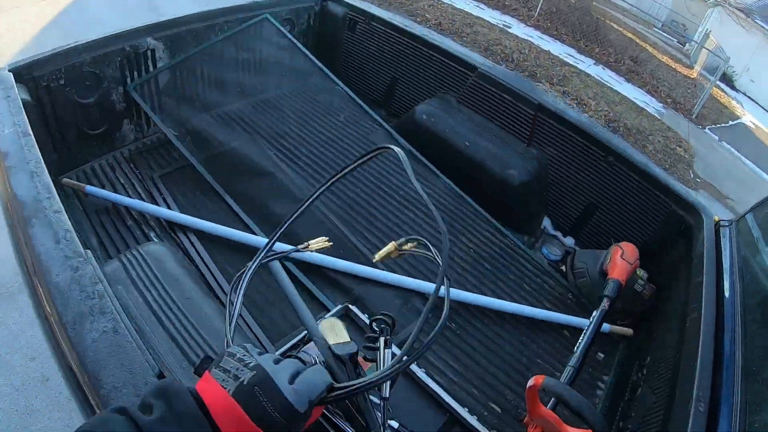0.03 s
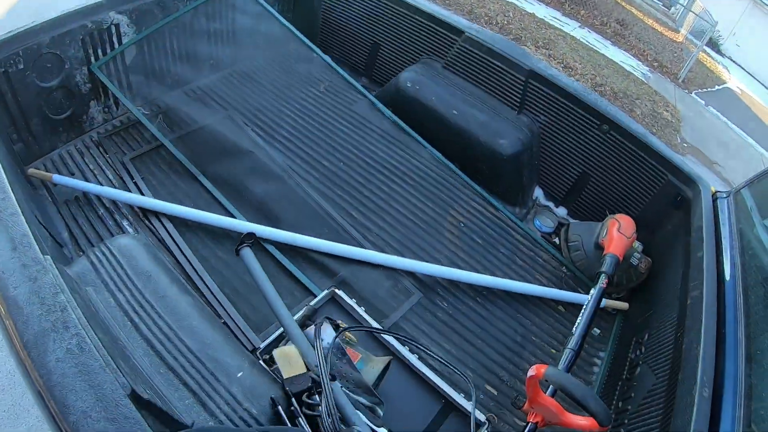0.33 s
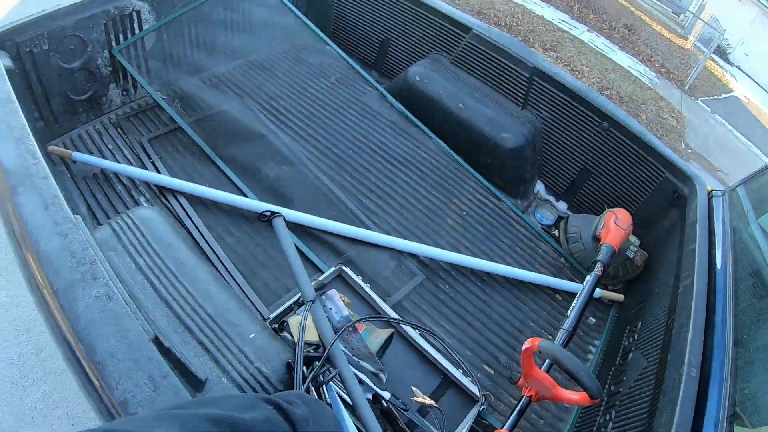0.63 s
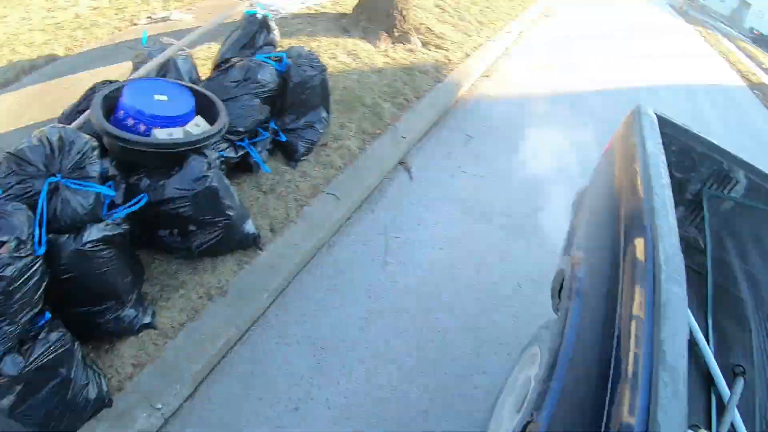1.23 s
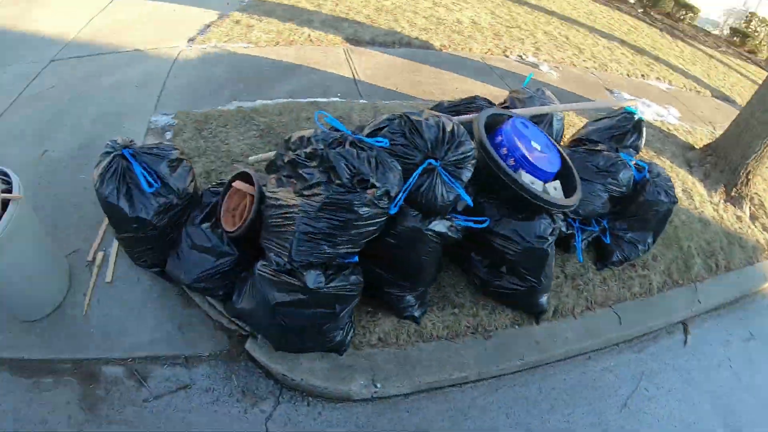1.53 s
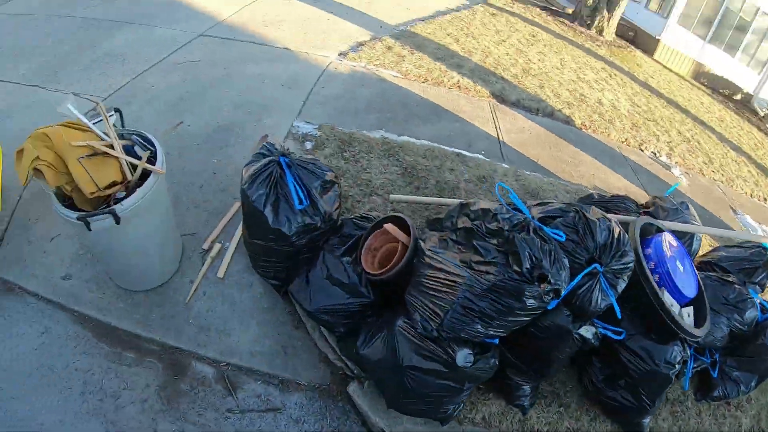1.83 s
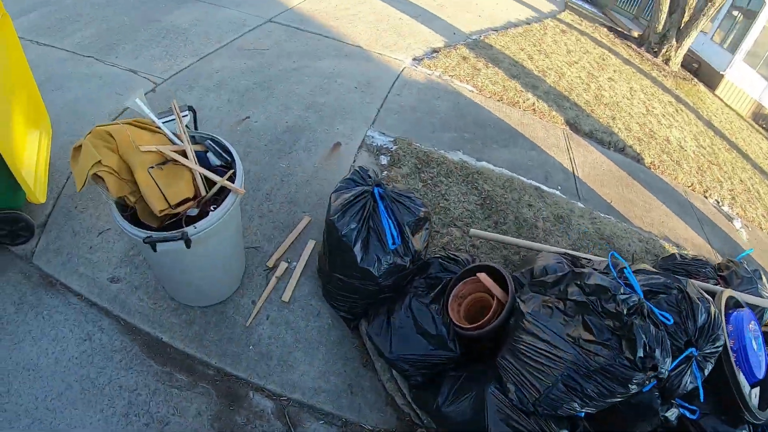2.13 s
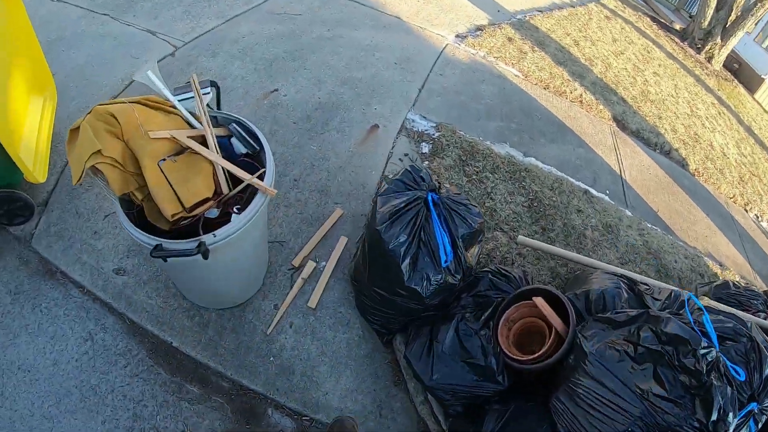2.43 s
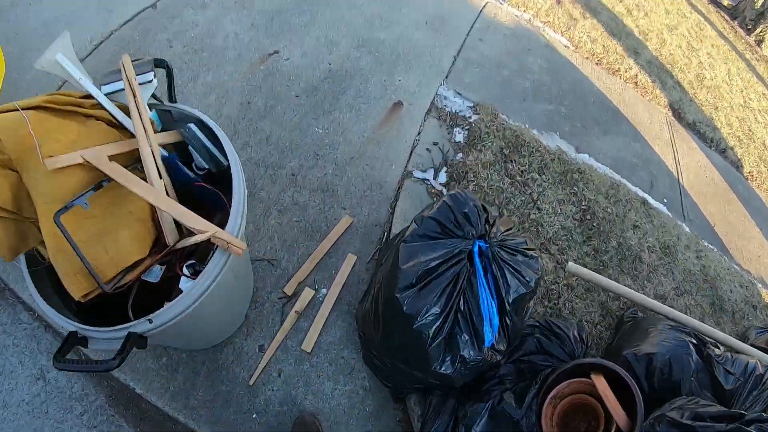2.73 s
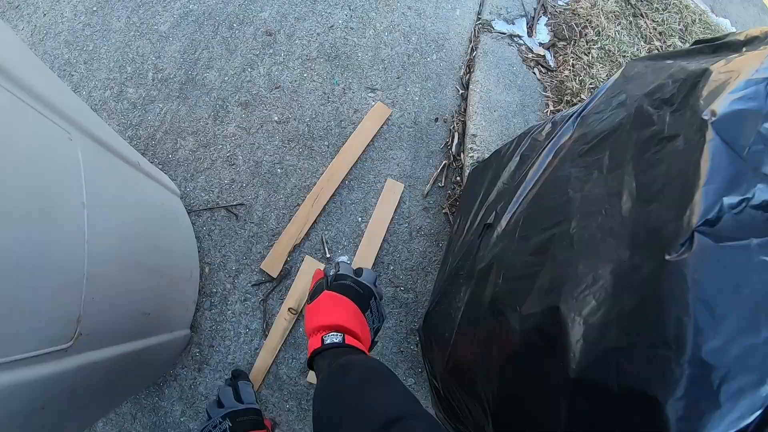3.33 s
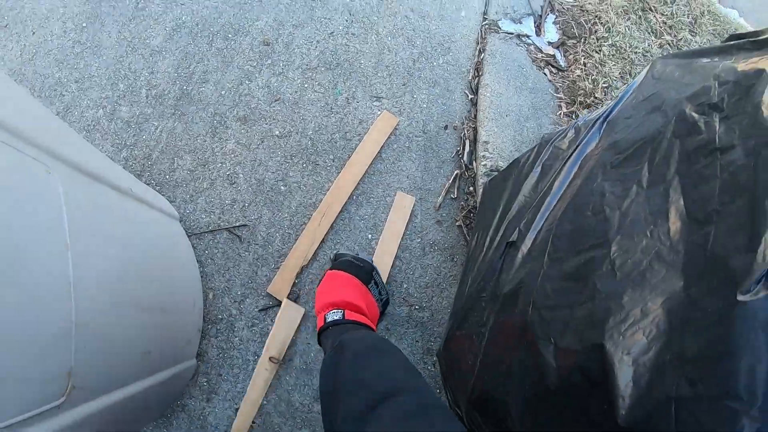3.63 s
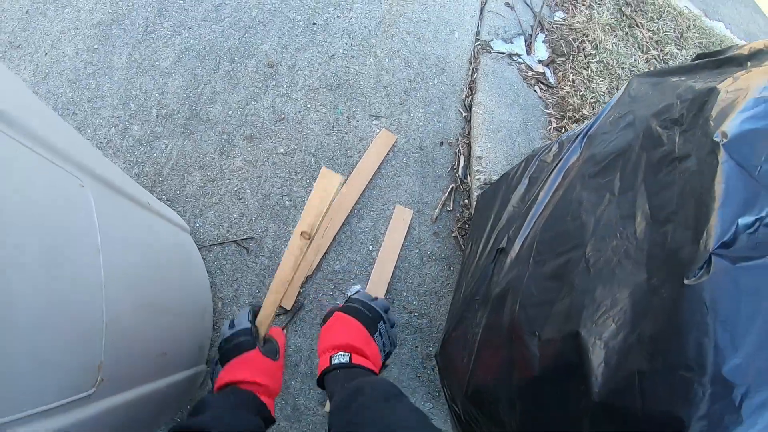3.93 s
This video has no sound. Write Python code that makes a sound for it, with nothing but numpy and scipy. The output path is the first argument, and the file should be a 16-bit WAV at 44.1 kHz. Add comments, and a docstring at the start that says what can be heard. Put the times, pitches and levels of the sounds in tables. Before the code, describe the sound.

Metal scrap crashes into a pickup bed, close and slightly right, clashing and sliding as the bed booms, and settles by about 1 second. An engine idles outdoors throughout, growing louder. From 1.4 seconds come a light jingle and faint footsteps, with wind buffeting the microphone around 1, 2 and 3 seconds. From 3.5 seconds, wooden slats click and scrape on concrete as they are gathered.

```python
"""Metal scrap crashes into a lined pickup bed, a little right of the microphone: it clashes, slides
and settles while the bed booms under it. An engine idles throughout in the open air. Soft footfalls
and a light jingle follow, a gust hits the microphone, and the stereo image narrows almost to mono.
Last, wooden slats click and scrape on concrete as they are gathered up."""
import sys
import numpy as np
from scipy import signal
from scipy.fft import rfft, irfft, next_fast_len
from scipy.io import wavfile
from scipy.ndimage import map_coordinates

SR = 44100
rng = np.random.default_rng(int(sys.argv[2]) if len(sys.argv) > 2 else 0)


def pcm_store(signal):
    """Save signal as 16-bit PCM."""
    levels = np.round(np.clip(np.atleast_2d(signal), -1, 1) * 32767)
    wavfile.write(sys.argv[1], SR, levels.astype(np.int16).T)


N = 176400  # 4 s
SCRAP_WIDTH, BED_WIDTH = 0.6, 0.1  # side over mid


def amp(db):
    """Decibels to gain."""
    return 10 ** (np.asarray(db) / 20)


def unit(x):
    """Scale to rms 1."""
    return x / np.sqrt(np.mean(abs(x) ** 2) + 1e-20)


def curves(rows):
    """One value per sample for each column after the time."""
    times, *columns = np.transpose(rows)
    return [np.interp(np.arange(N) / SR, times, column) for column in columns]


def wobble(rate):
    """A smooth random curve, rate knots a second."""
    return map_coordinates(rng.standard_normal(int(N * rate / SR) + 4), [np.arange(N) * rate / SR])


def colour(x, points, tilt=0):
    """Shape x by (Hz, dB) points and a tilt in dB per octave; rms 1."""
    size = next_fast_len(x.shape[-1] + 2048)
    octave = np.log2(np.fft.rfftfreq(size, 1 / SR) + 1)
    hz, db = np.transpose(points)
    gain = amp(np.interp(octave, np.log2(hz), db) + tilt * np.maximum(octave, np.log2(hz[0])))
    return unit(irfft(rfft(x, size) * gain, size)[..., :x.shape[-1]])


def noise(points, width, size, tilt=0):
    """Coloured noise as mid and side."""
    return colour(rng.standard_normal((2, size)), points, tilt) * [[1], [width]]


def broad(hz):
    """A wide, heavily damped resonance as (Hz, dB) points."""
    return [(hz / 10, -26), (hz / 2.5, -8), (hz * .8, 0), (hz * 1.25, 0),
            (hz * 1.7, -13), (hz * 3, -23), (hz * 4, -42), (hz * 20, -80)]


def burst(points, width, t, t60, attack):
    """A struck puff of coloured noise, its energy set by its envelope."""
    shape = amp(-60 * t / t60) * (1 - np.exp(-t / attack))
    pair = noise(points, 1, len(t)) * shape
    return pair / np.linalg.norm(pair, axis=1, keepdims=True) * np.linalg.norm(shape) * [[1], [width]]


def ring(modes, width, t, spread_db=4):
    """Modes struck at a random spot, as mid and side."""
    hz, db, t60 = np.transpose(modes)[:, :, None]
    waves = amp(db - 60 * t / t60) * np.exp(2j * np.pi * hz * t)
    gains = amp(rng.normal(0, spread_db, (2, len(hz))))
    phases = np.exp(2j * np.pi * rng.random((2, len(hz))))
    shape = (1 - np.exp(-t / 0.00057)) * (1 - (t / t[-1]) ** 6)
    return shape * (unit(gains * phases) @ waves).real * [[1], [width]]


def slips(rate, spread_db):
    """Random tiny contacts of uneven size, about rate a second."""
    signs = (rng.random(N) < rate / SR) * rng.choice([-1, 1], N)
    return signs * amp(spread_db * rng.standard_normal(N).clip(-2, 2))


def excite(contacts, ringing):
    """Start the ringing anew at every contact."""
    return signal.fftconvolve(contacts[None], ringing, axes=1)[:, :N]


def swell(length):
    """A smooth rise and fall over length seconds."""
    return np.sin(np.linspace(0, np.pi, max(int(length * SR), 8)))


def add(track, start, sound):
    """Mix a sound in at a time in seconds."""
    part = track[:, max(round(start * SR), 0):][:, :sound.shape[1]]
    part += sound[:, :part.shape[1]]


def ears(pair, pan_db=0):
    """Mid and side to left and right; positive pan leans left."""
    return np.array([pair[0] + pair[1], pair[0] - pair[1]]) * amp([[pan_db], [-pan_db]])


# Air around the microphone. Each row: time in seconds, then rush, hiss and low roar levels in dB.
AIR = [(0.9, -57.5, -67.5, -52), (1.12, -55, -64.5, -52.5), (1.53, -55, -63, -44.5),
       (1.89, -52, -64, -43.5), (2.37, -51, -67, -51), (2.63, -46, -61.5, -45.5), (2.89, -45, -61.5, -40.5),
       (3.36, -46.5, -65, -47.5), (3.7, -50, -63.5, -41.5), (4.0, -49.5, -64, -45.5)]
# Their spectra. Each row: frequency in Hz, level in dB.
RUSH_COLOUR = [(300, -15.5), (800, 2), (1500, 2), (2400, -2), (3500, -5), (4500, -11.5), (5500, -18),
               (8000, -25), (12000, -61.5)]
HISS_COLOUR = [(2000, -16), (5500, 0.5), (7500, 4), (9900, -1), (11000, -15), (15000, -47.5)]
ROAR_COLOUR = [(100, 0), (300, 1.5), (450, 0), (700, -5), (1000, -10), (1600, -17.5), (4000, -49)]
# Wind right on the microphone. Each row: start and length in seconds, level in dB, centre in Hz,
# side over mid, leftward pan in dB.
BUFFETS = [(.87, 0.058, -33, 126, 1.4, -6), (1.03, 0.056, -25.5, 99, 1.4, -6.5),
           (1.052, 0.023, -41, 367, 1.7, -3.5), (1.95, 0.28, -21.5, 50.4, 0.89, -2),
           (1.97, 0.19, -24, 170, 1.2, 0), (2.035, .13, -32, 340, 2.1, 0.5), (2.05, .035, -32, 560, 2.3, 1),
           (2.094, 0.075, -47, 872.5, 1.2, -0.5), (2.995, 0.07, -17.5, 122, 0.04, 7)]


def wind():
    """Outdoor rush, roar and hiss, with short buffets on the microphone."""
    rush_db, hiss_db, roar_db = curves(AIR)
    rush = amp(rush_db + 2 + 1.1 * wobble(17)) * noise(RUSH_COLOUR, 0.57, N)
    roar = amp(roar_db + 2 + 1.1 * wobble(16)) * noise(ROAR_COLOUR, 0.59, N)
    hiss = amp(hiss_db + 1) * noise(HISS_COLOUR, 1, N)
    out = ears(rush + roar + hiss, pan_db=-1)
    for start, length, db, hz, width, pan_db in BUFFETS:
        shape = swell(length)
        hump = [(hz / 8, -34), (hz / 2, -14), (hz * 0.56, 0), (hz * 1.3, 0),
                (hz * 1.66, -17), (hz * 5, -40), (hz * 20, -80)]
        add(out, start, ears(amp(db) * shape * noise(hump, width, len(shape)), pan_db))
    return out


# The idle, dead centre. Each row: time in seconds, shaft rate in Hz, boom level in dB.
IDLE = [(0, 29.43, -34.5), (.8, 30.42, -36), (.96, 30.36, -48.5), (1.1, 30.13, -32.5), (1.4, 30.51, -28.5),
        (1.69, 30.4, -25), (2.2, 29.54, -26.5), (2.35, 29.53, -29), (2.57, 29.26, -30.5), (2.7, 29.41, -23),
        (2.95, 29.33, -25), (3.3, 29.2, -23.5), (3.48, 29.82, -17.5), (3.6, 29.71, -15.5),
        (3.82, 29.62, -20.5), (4, 30.58, -17)]
# Exhaust boom and the buzz above it. Each row: multiple of the shaft rate, relative level in dB.
BOOM_ORDERS = [(1, -18.5), (2, -2.5), (3, 5.5), (4, -31.5)]
BUZZ_ORDERS = [(5, -45), (6, -43), (7, -42), (8, -47.5), (9, -48.5), (10, -52), (11, -55), (14, -53.5)]
# The rumble beneath. Each row: frequency in Hz, level in dB.
RUMBLE_COLOUR = [(20, -3.5), (45, 8.5), (110, 3.5), (220, -8), (350, -25), (600, -24.5), (1500, -66)]


def engine():
    """Three firings a turn, uneven enough to throb at the shaft rate, over a low rumble."""
    hz, db = curves(IDLE)
    turn = 2 * np.pi * np.cumsum(hz * (1 + 0.0029 * wobble(8))) / SR
    boom = buzz = 0
    for k, level in BOOM_ORDERS:
        boom += amp(level + 0.87 * wobble(10)) * np.cos(k * turn + 0.32 * wobble(31))
    for k, level in BUZZ_ORDERS:
        gain = amp(level + 2 * wobble(10))
        buzz += gain * np.cos(k * turn + 2 * np.pi * rng.random() + 0.39 * wobble(13))
    buzz *= amp(0.47 * (db - db.mean()))  # follows about half of the boom's swings in dB
    rumble = amp(-31.5 + 0.7 * wobble(7.9)) * noise(RUMBLE_COLOUR, 0.37, N)
    return amp(db) * unit(boom) + buzz + ears(rumble)


# Footfalls on concrete. Each row: start and length in seconds, relative level in dB.
STEPS = [(1.5, 0.027, -38), (1.957, 0.012, -33), (2.739, .012, -28.5)]
# Their spectrum. Each row: frequency in Hz, level in dB.
STEP_COLOUR = [(150, -7), (400, 5), (750, 13), (1300, -9), (3000, -17), (9000, -39.5)]
# A small piece of metal jingles. Each row: start in seconds, level in dB.
JINGLES = [(1.424, -40.5), (1.427, -35), (1.433, -34), (1.44, -37)]
# Its modes. Each row: frequency in Hz, level in dB, t60 in seconds.
TRINKET_MODES = [(3340, -6, .04), (4400, -8, .03), (6100, -2, .04), (6700, -5, .03), (7180, -1, .045),
                 (7890, 1, .04), (8300, -3, .03), (9300, -7, .03), (10400, -8, .03)]


def carrier():
    """Soft footfalls and one light jingle of metal, off to the right of the microphone."""
    out, t = np.zeros((2, N)), np.arange(SR // 8) / SR
    for start, length, db in STEPS:
        add(out, start, amp(db + 3) * burst(STEP_COLOUR, 0.78, t, t60=3 * length, attack=0.0017))
    for start, db in JINGLES:
        tick = noise(CLASH_COLOUR, 1, len(t), tilt=6.3) * amp(-1.5 - 60 * t / 0.023)
        add(out, start, amp(db) * (tick + amp(-6.5) * ring(TRINKET_MODES, 1, t, spread_db=1.5)))
    return ears(out, pan_db=-4.5)


# Small dry clicks. Each row: start in seconds, level in dB, centre in Hz, t60 in seconds.
CLICKS = [(.968, -34, 3040, 0.02), (1.2, -37, 3120, 0.039), (2.012, -33, 2000, 0.039),
          (3.177, -34.5, 3270, .035), (3.4992, -22.5, 1680, 0.016), (3.791, -28, 1829, 0.013)]
# Grit under the slats. Each row: start and length in seconds, level in dB, tilt in dB per octave.
SCUFFS = [(3.655, 0.061, -48.5, -1.5), (3.678, .02, -38, 0), (3.747, .035, -55.5, -2)]
# Its hiss. Each row: frequency in Hz, level in dB.
SCUFF_COLOUR = [(1200, -37.5), (4600, -4), (6000, -12.5), (7500, -8.5), (8700, -6.5), (9900, 4),
                (11500, -18), (15000, -25)]


def handling(squeak_s=3.73, squeak_hz=3100):
    """Dry clicks, gritty scuffs and the brief squeak of a slat on concrete."""
    out, t = np.zeros((2, N)), np.arange(SR // 8) / SR
    for start, db, hz, t60 in CLICKS:
        add(out, start, amp(db) * burst(broad(hz), 0.55, t, t60, attack=0.00015))
    for start, length, db, tilt in SCUFFS:
        shape = swell(length)
        grit = noise(SCUFF_COLOUR, 1, len(shape), tilt)
        add(out, start, grit * shape * amp(db + 2.2 * wobble(710)[:len(shape)]))
    shape = swell(0.016)
    phase = 2 * np.pi * np.cumsum(squeak_hz * (1 + .03 * wobble(900)[:len(shape)])) / SR
    add(out, squeak_s, amp(-28) * shape * np.sin(phase) * [[1], [0]])
    return ears(out)


# A wooden slat's modes. Each row: frequency in Hz, level in dB, t60 in seconds.
SLAT_MODES = [(2020, -16.5, 0.035), (2650, -5, 0.021), (2950, -2, 0.017), (3190, -2.5, 0.024),
              (3580, -5.5, 0.018), (4170, -1, 0.012), (4650, -6, 0.01), (6990, -19, 0.0089),
              (9700, -17, .004)]
# Slats knock together. Each row: start in seconds, level in dB.
CLACKS = [(3.552, -39), (3.566, -41), (3.66, -36), (3.6827, -19.5), (3.7339, -23), (3.917, -32.5)]
# Slats drag over the concrete. Each row: start and length in seconds, level in dB.
DRAGS = [(3.635, 0.053, -40), (3.716, .03, -45), (3.745, .04, -46), (3.878, 0.031, -45.5),
         (3.912, 0.052, -45)]


def slats():
    """Wooden slats, centred on the microphone, ring once at a clack and over and over as they drag."""
    out, t = np.zeros((2, N)), np.arange(SR // 8) / SR
    for start, db in CLACKS:
        add(out, start, amp(db) * ring(SLAT_MODES, .5, t, spread_db=0))
    for start, length, db in DRAGS:
        shape = swell(length)
        catches = slips(rate=2500, spread_db=2)[:len(shape)] * shape
        wood = excite(catches, ring(SLAT_MODES, .5, t, spread_db=2))
        add(out, start, amp(db) * wood * np.linalg.norm(shape) / np.linalg.norm(wood[0]))
    return ears(out)


# The load slides in the bed. Each row: time in seconds, level in dB.
SLIDE = [(.04, -68), (.06, -33), (.105, -34.5), (.17, -29), (.25, -31.5), (.31, -34.5), (.37, -30.5),
         (.42, -32.5), (.475, -34.5), (.52, -24.5), (.58, -30), (.645, -27), (.7, -38.5), (.76, -40),
         (.81, -44.5), (.9, -72)]
# Its grinding. Each row: frequency in Hz, level in dB.
SLIDE_COLOUR = [(150, -50.5), (400, -2), (850, 4), (1300, -4.5), (1700, -4.5), (3200, -9), (5000, -18),
                (10000, -26.5), (11300, -39), (15000, -51.5)]
# The scrap's modes. Each row: frequency in Hz, level in dB, t60 in seconds.
STEEL_MODES = [(817, -1, .3), (860, 2, .35), (997, -6, .3), (1078, -4, .3), (1229, -9, .25),
               (1556, -2, .18), (1663, -5, .15), (1780, -5, .12), (2228, -4, .18), (2606, -6, .18),
               (3008, -3, .2), (3494, -5, .18), (4452, -8, .15), (5017, -10, .15), (6150, -11, .12),
               (8700, -15, .1)]


def sliding_scrap(chatter_t60=0.027):
    """A stream of tiny contacts grinds and makes the steel sing."""
    t = np.arange(SR // 5) / SR
    contacts = slips(rate=1900, spread_db=7.5)
    power = signal.fftconvolve(contacts ** 2, amp(-120 * t / chatter_t60))[:N]
    chatter = np.sqrt(abs(power)) * rng.standard_normal((2, N))
    grind = colour(chatter, SLIDE_COLOUR) * [[1], [SCRAP_WIDTH]]
    sing = unit(excite(contacts, ring(STEEL_MODES, SCRAP_WIDTH, t, spread_db=5)))
    return amp(curves(SLIDE)[0]) * (grind + amp(-15.5) * sing)


# Blows on the bed. Each row: start in seconds, relative level in dB, centre in Hz, ring-on in dB.
THUDS = [(.058, -20.5, 317, -1.5), (0.151, -27.5, 172, -6), (.2, -17.5, 149, -8.5), (0.277, -19, 89, -23),
         (0.331, -19, 500, -6.5), (.415, -16, 620, -10.5), (0.507, -27, 328, -5.5), (.571, -26, 478, -8),
         (0.615, -24, 382, -1), (0.644, -25.5, 328, -1), (.765, -34, 343, -9)]
# The panels' modes. Each row: frequency in Hz, level in dB, t60 in seconds.
BED_MODES = [(118.6, -2.5, 0.69), (171.3, 1.5, 0.53), (210.5, -7, 0.75), (248.3, -7.5, 0.85),
             (335, -5.5, 0.5), (386.4, -5.5, 0.37), (497, -14.5, 0.32), (609, -7, 0.28), (776, -14, 0.067)]
# Their rumble under the slide. Each row: frequency in Hz, level in dB.
BED_COLOUR = [(20, -39), (50, -9), (80, -6.5), (160, 6.5), (380, 5), (700, -13.5), (1300, -25), (3000, -46),
              (9000, -68.5)]


def truck_bed():
    """The panels boom under each blow and drum as the load slides over their ribs."""
    out, t = np.zeros((2, N)), np.arange(SR // 3) / SR
    for start, db, hz, ring_db in THUDS:
        knock = amp(3.5) * burst(broad(hz), BED_WIDTH, t, t60=0.099, attack=0.00041)
        boom = amp(ring_db - 1.5) * ring(BED_MODES, BED_WIDTH, t, spread_db=2)
        add(out, start, amp(db) * (knock + boom))
    bumps = slips(rate=300, spread_db=2)
    drum = amp(-4) * unit(excite(bumps, ring(BED_MODES, BED_WIDTH, t, spread_db=2)))
    rumble = amp(-1) * noise(BED_COLOUR, BED_WIDTH, N)
    return out + amp(curves(SLIDE)[0] + 6.5) * (drum + rumble)


# The heaviest landings. Each row: start in seconds, level in dB, pitch in Hz, t60 in seconds.
FLEXES = [(0.053, -9, 119, 0.14), (.331, -8, 310, 0.048), (.337, -11, 163.3, 0.2), (.4145, -7, 717, 0.051),
          (.417, -5.5, 440, 0.046), (.431, -7.5, 164.4, 0.15)]


def floor_flex():
    """The bed floor gives under a heavy landing and springs back in a damped swing."""
    out, t = np.zeros((2, N)), np.arange(SR // 5) / SR
    for start, db, hz, t60 in FLEXES:
        shape = amp(db - 60 * t / t60) * (1 - np.exp(-t * hz * 2))
        add(out, start, shape * np.sin(2 * np.pi * hz * t) * [[1], [0]])
    return out


# Loose pieces in the bed. Each row: start in seconds, pitch in Hz, relative level in dB,
# t60 in seconds, scatter as a share of the pitch.
PINGS = [(.114, 1540, -26, 0.085, 0.015), (.15, 3025, -26, 0.16, 0.011), (.234, 1625, -28, 0.19, 0.0091),
         (0.236, 3210, -22, 0.045, 0.13), (.505, 857, -24.5, 0.33, 0.0045), (.785, 2860, -42, 0.19, 0.055),
         (.809, 1860, -31.5, 0.1, .05), (.818, 4220, -43, .03, .04), (.967, 3000, -37.5, 0.07, 0.063),
         (1.0, 2670, -47, 0.12, 0.073), (1.207, 2800, -41.5, 0.092, 0.093)]


def loose_pieces():
    """Each piece rings in a cluster of five close modes as it lands and settles."""
    out, t = np.zeros((2, N)), np.arange(SR // 5) / SR
    for start, hz, db, t60, scatter in PINGS:
        cluster = [(hz * (1 + scatter * k), db - 5.5, t60) for k in rng.standard_normal(5)]
        add(out, start, ring(cluster, SCRAP_WIDTH, t))
    return out


# The spectrum of metal on metal. Each row: frequency in Hz, level in dB.
CLASH_COLOUR = [(200, -3.5), (600, 0.5), (900, 0), (1300, 1), (1700, 3.5), (3200, -2), (5000, -10),
                (7000, -17), (10000, -23), (11300, -35), (15000, -50.5)]


def tangle(t, tilt, count=40, mean_t60=0.12):
    """The many short modes of whichever rods and wires are hit."""
    pitch_draw, decay_draw = rng.random((count, 2)).T
    hz = 700 + 10000 * pitch_draw ** 1.4
    db = np.interp(hz, *np.transpose(CLASH_COLOUR)) + (tilt + 1) * np.log2(hz / 1000)
    db -= 10 * np.log10(np.sum(amp(db) ** 2) / 2)  # total power 1
    return ring(np.transpose([hz, db, mean_t60 * (.5 + decay_draw)]), SCRAP_WIDTH, t)


# Scrap lands in the bed. Each row: start in seconds, level in dB, tilt in dB per octave, ring-on in dB.
CLASHES = [(.047, -21, 6.5, -11), (.115, -20, 0, -12.5), (.125, -21, -0.5, -35), (.149, -17.5, 8, -8),
           (.157, -22, 1, 3), (.164, -28.5, -4, 7), (.188, -32, 2.5, 6.5), (.217, -29.5, 4, 1.5),
           (.234, -19, 3.5, -4.5), (.263, -23.5, 1.5, -2.5), (.279, -34, 11, -6), (.329, -22, 3, -0.5),
           (.346, -28, 8.5, -5.5), (.394, -27, 11, 1), (.404, -16.5, 0, -8), (.412, -16.5, -4, -2.5),
           (.439, -23, -0.5, -0.5), (.445, -15, -1.5, -7.5), (.485, -19, -2, -7.5), (.499, -35, 7, 7.5),
           (.512, -21.5, -5, 5.5), (.572, -26, -5.5, 4), (.603, -24.5, -4, 0.5), (.647, -21.5, -2, -9),
           (.709, -28, -6, -4), (.727, -21, -1, -13.5), (.753, -32, -3, 1), (.811, -35, -2, -4),
           (.842, -34.5, 3, -6), (.85, -33, 2, -25), (1.203, -36.5, -5.5, -1.5)]
# The first rod to land. Each row: mode frequency in Hz, level in dB, t60 in seconds.
ROD_MODES = [(1696, -13, .04), (2880, -4, .025), (3784, 0, .03), (4050, -1, .03), (4330, -2, .028),
             (6800, -11, .025), (7294, -10, .034), (7677, -11, .04)]


def clashing_scrap(crack_t60=0.03, wash_t60=0.14, rod_s=0.0472):
    """Each clash cracks, shakes the tangle and rings the steel; the first rod adds its own clank."""
    out, t = np.zeros((2, N)), np.arange(SR // 5) / SR
    attack = 1 - np.exp(-t / 0.0016)
    for start, db, tilt, ring_db in CLASHES:
        shape = amp(-60 * t / crack_t60) + amp(ring_db - 7 - 60 * t / wash_t60)
        crack = amp(-2) * noise(CLASH_COLOUR, SCRAP_WIDTH, len(t), tilt) * shape
        rings = amp(-20.5) * ring(STEEL_MODES, SCRAP_WIDTH, t) + amp(-2.5) * tangle(t, tilt)
        add(out, start, amp(db) * (crack + amp(ring_db) * rings) * attack)
    add(out, rod_s, amp(-17.5) * ring(ROD_MODES, 0.46, t, spread_db=3))
    return out


# Where the load sits. Each row: frequency in Hz, leftward pan in dB.
LOAD_PAN = [(100, 0), (400, -0.5), (750, -3), (1300, -2), (4400, -.8), (8000, -1.2)]
# How wide it sounds. Each row: frequency in Hz, side gain in dB.
LOAD_SPREAD = [(300, -0.5), (700, -4.5), (1400, 1.5), (3000, -5), (4500, -3), (7000, 5)]


def place_load(pair):
    """The load lies right of the microphone; its pan and spread depend on frequency."""
    size = next_fast_len(N + 8192)
    octave = np.log2(np.fft.rfftfreq(size, 1 / SR) + 1)
    pan, spread = [amp(np.interp(octave, np.log2(hz), db))
                   for hz, db in map(np.transpose, (LOAD_PAN, LOAD_SPREAD))]
    mid, side = rfft(pair, size)
    return irfft(np.array([(mid + spread * side) * pan, (mid - spread * side) / pan]), size)[:, :N]


def scene():
    """All sources as they reach the microphone, left and right."""
    load = clashing_scrap() + loose_pieces() + sliding_scrap() + truck_bed() + floor_flex()
    return place_load(load) + carrier() + handling() + slats() + engine() + wind()


# Stereo width at the microphone. Each row: time in seconds, side gain in dB.
STEREO_WIDTH = [(0, 1), (2.15, 1), (2.4, -10.5), (3, -27), (3.2, -45)]
CEILING, TOP_HZ = 0.8, 15650  # soft overload as a share of full scale, band limit


def record(dry):
    """Peaks are rounded, the image narrows almost to mono after the gust, and the top treble is cut."""
    left, right = dry / (1 + (dry / CEILING) ** 6) ** (1 / 6)
    mid = (left + right) / 2
    side = (left - right) / 2 * amp(curves(STEREO_WIDTH)[0])
    size = next_fast_len(N + 8192)
    passband = np.fft.rfftfreq(size, 1 / SR) < TOP_HZ
    return irfft(rfft(ears([mid, side]), size) * passband, size)[:, :N]


dry = scene()
out = record(dry)
pcm_store(out)
```